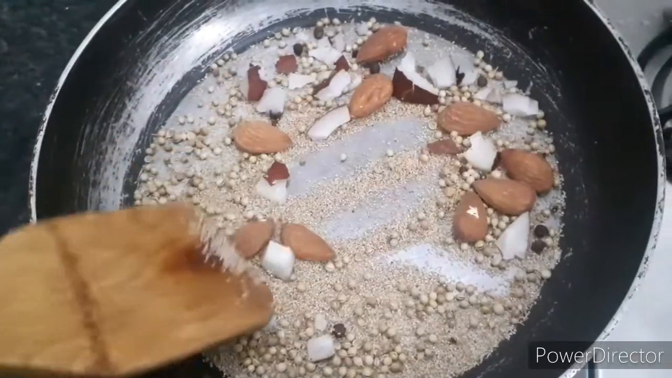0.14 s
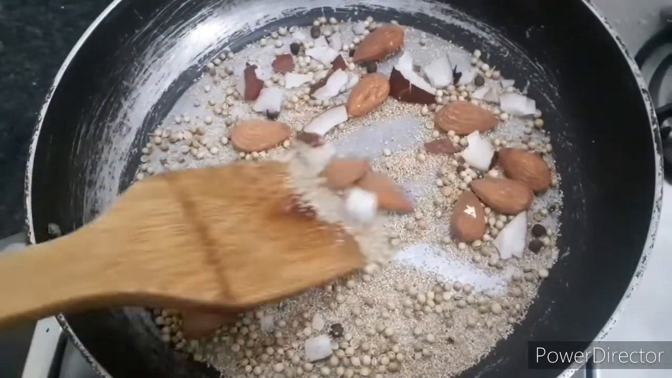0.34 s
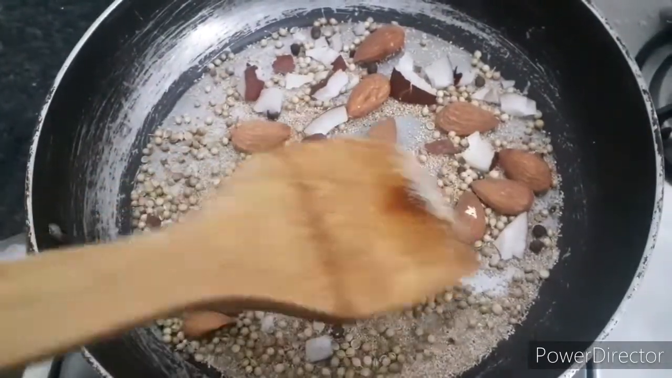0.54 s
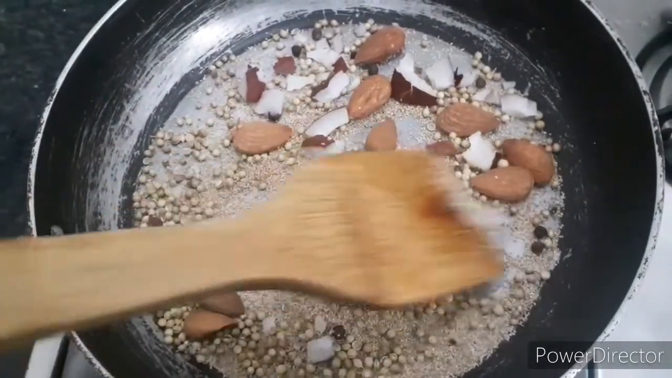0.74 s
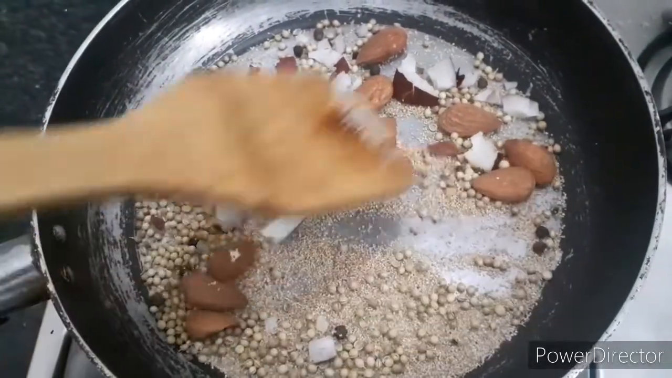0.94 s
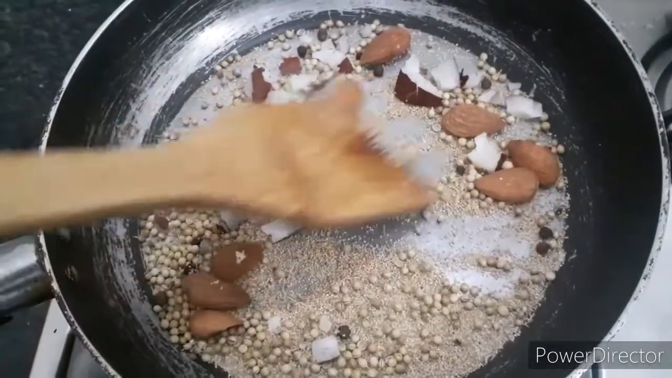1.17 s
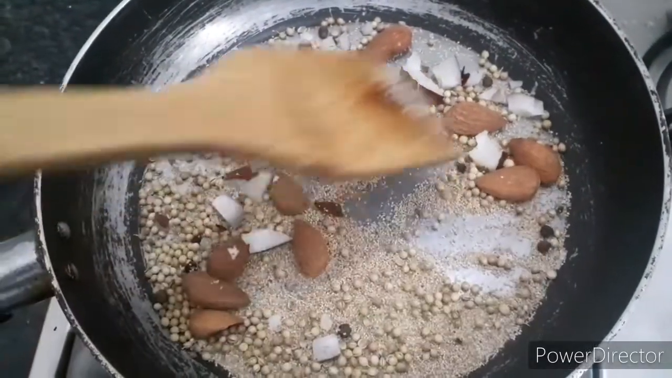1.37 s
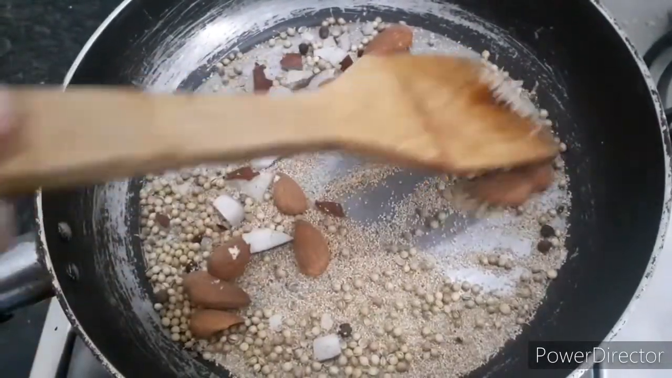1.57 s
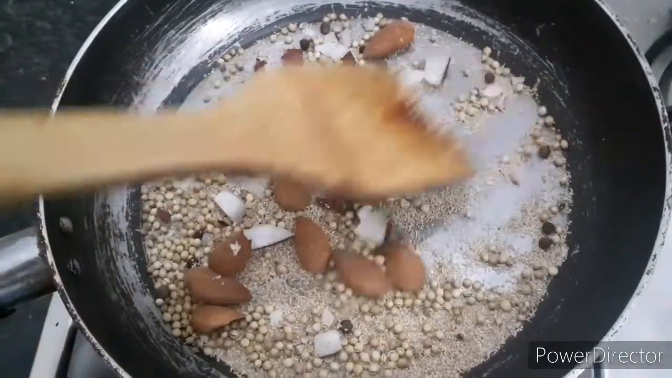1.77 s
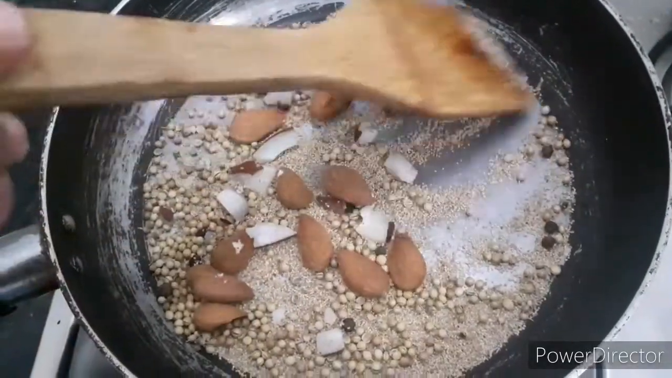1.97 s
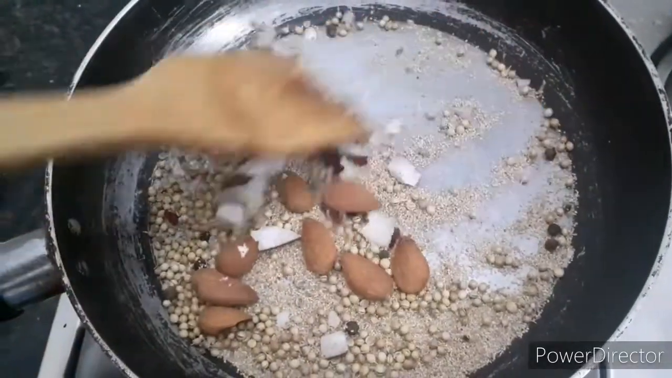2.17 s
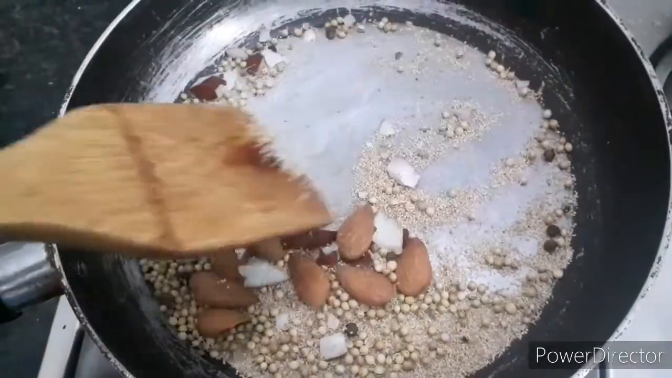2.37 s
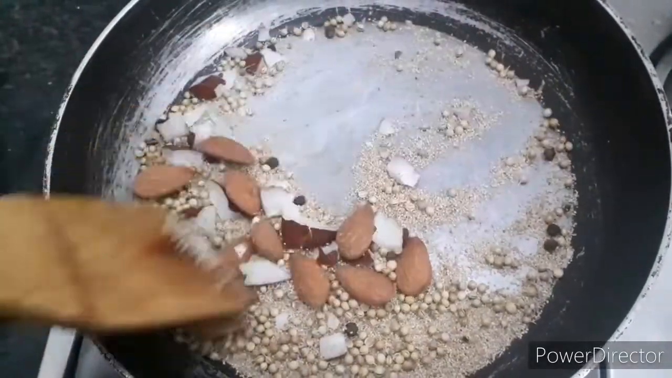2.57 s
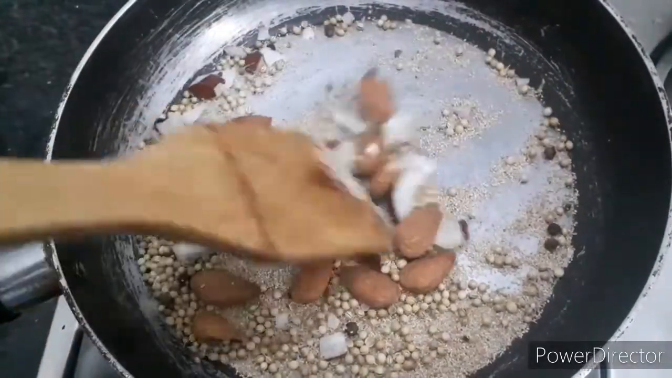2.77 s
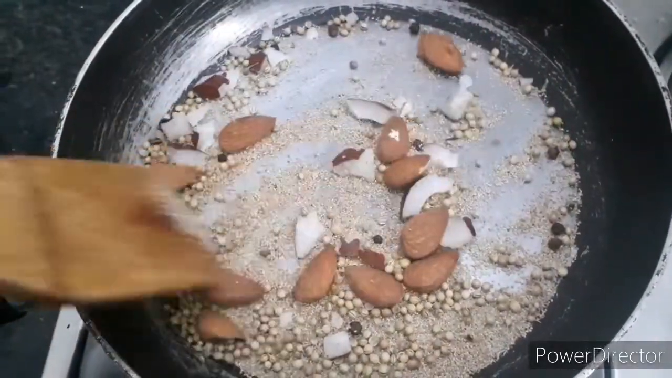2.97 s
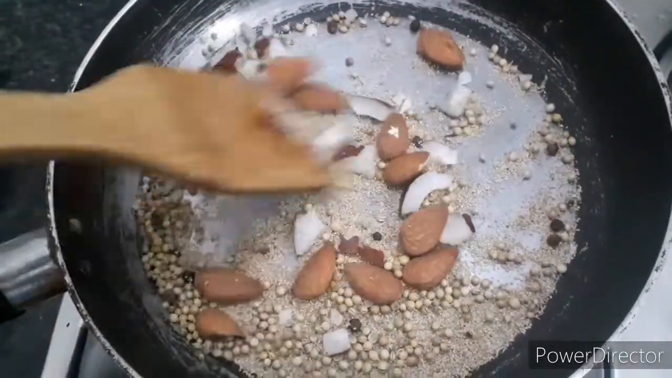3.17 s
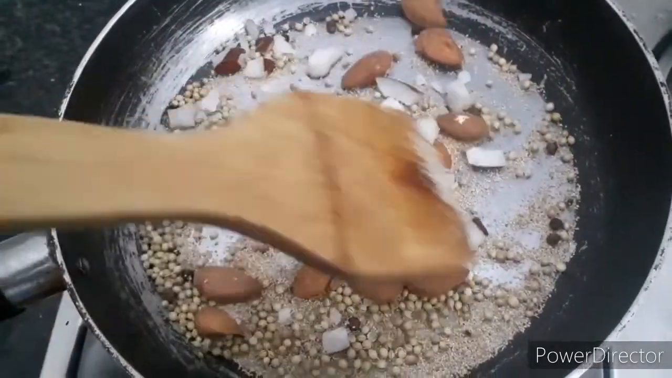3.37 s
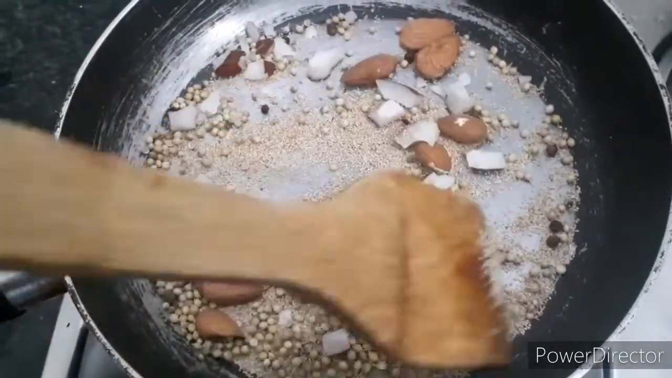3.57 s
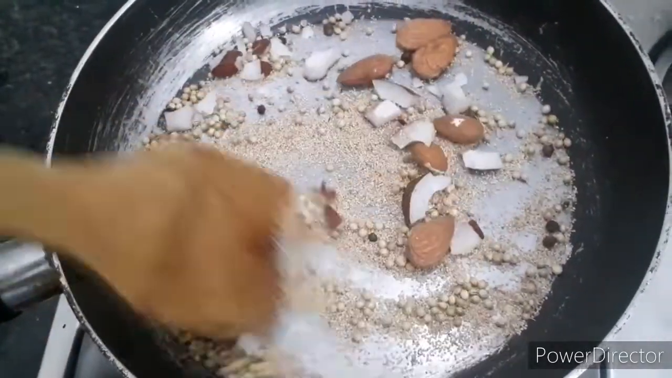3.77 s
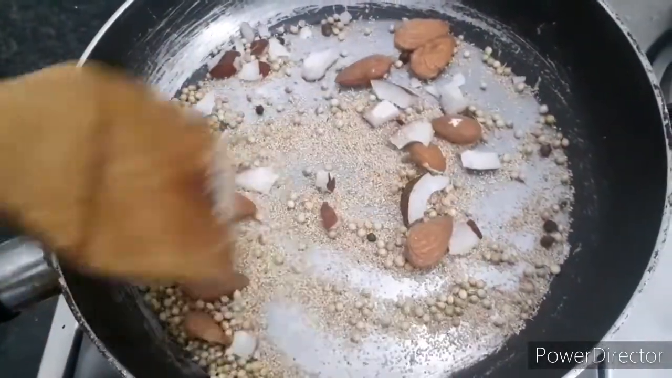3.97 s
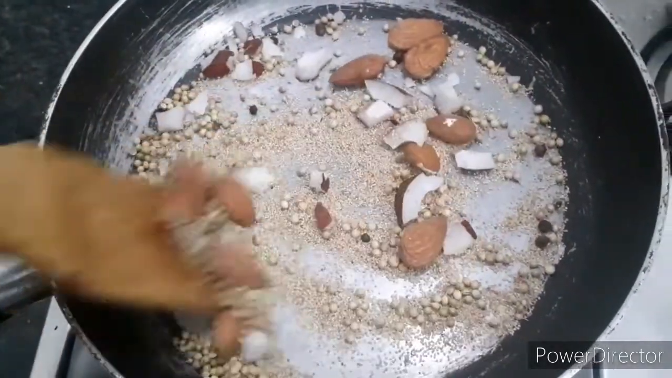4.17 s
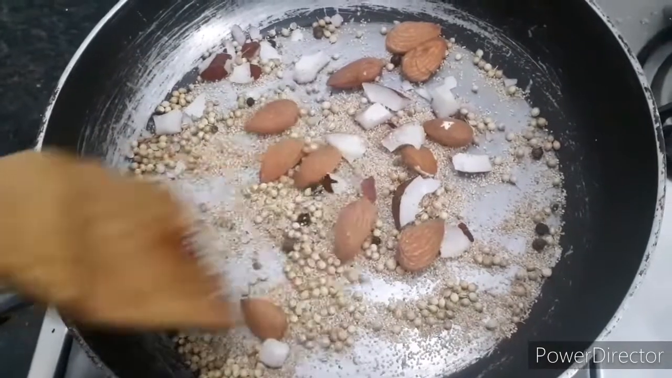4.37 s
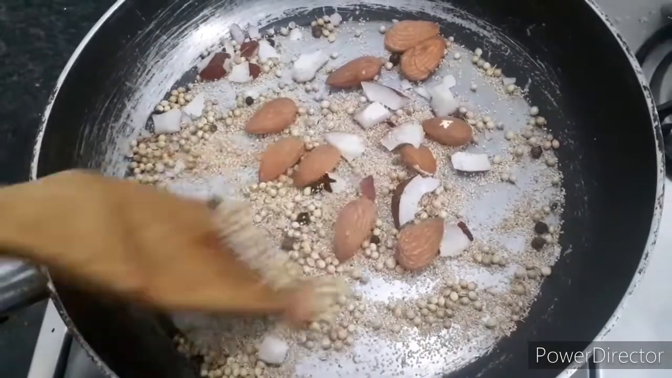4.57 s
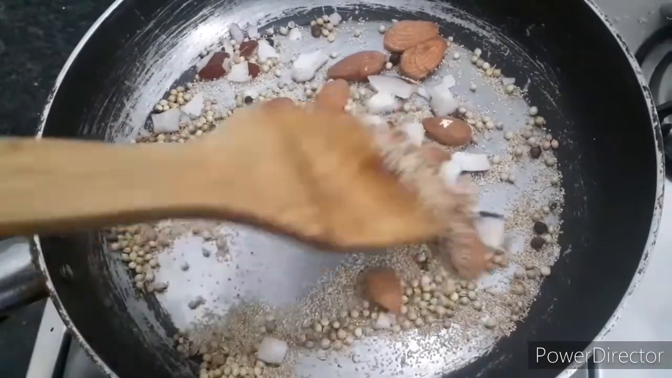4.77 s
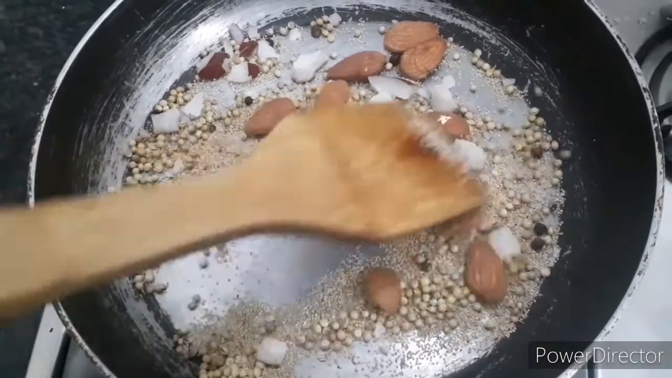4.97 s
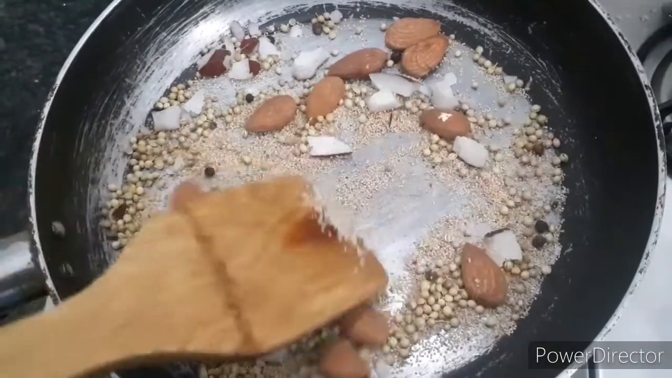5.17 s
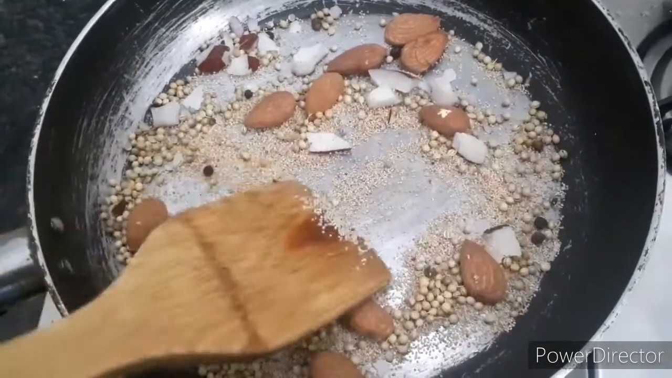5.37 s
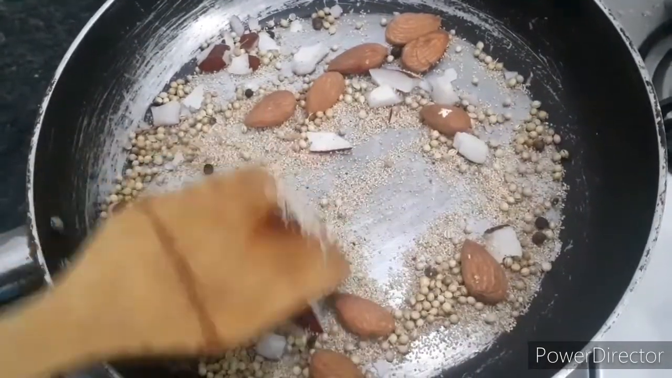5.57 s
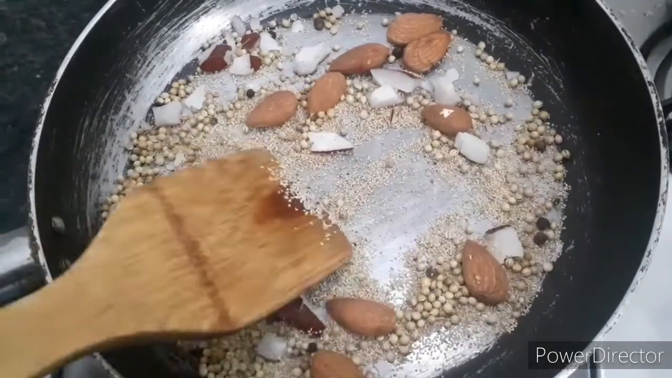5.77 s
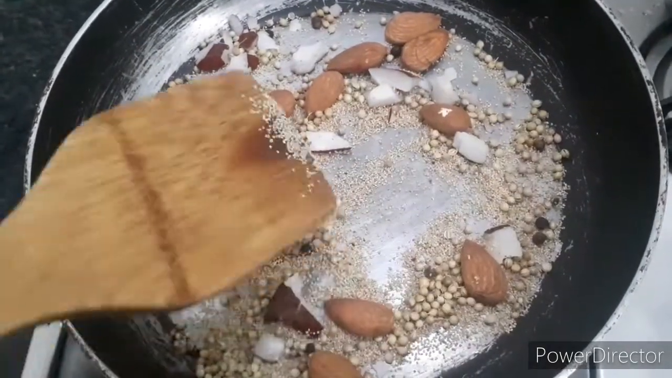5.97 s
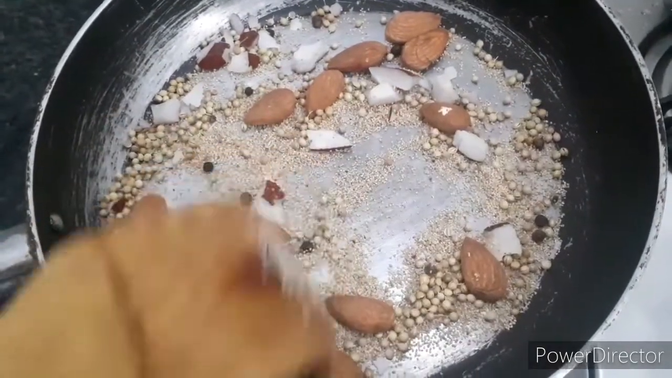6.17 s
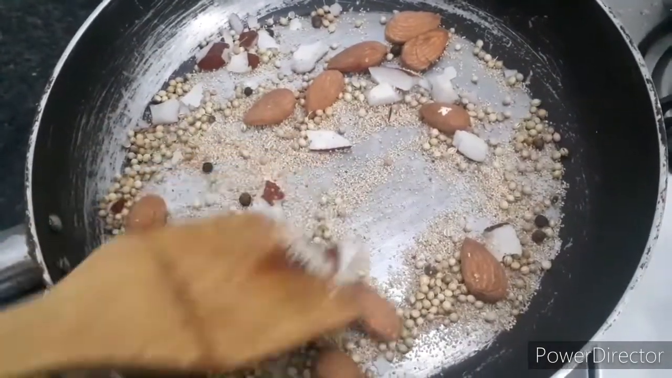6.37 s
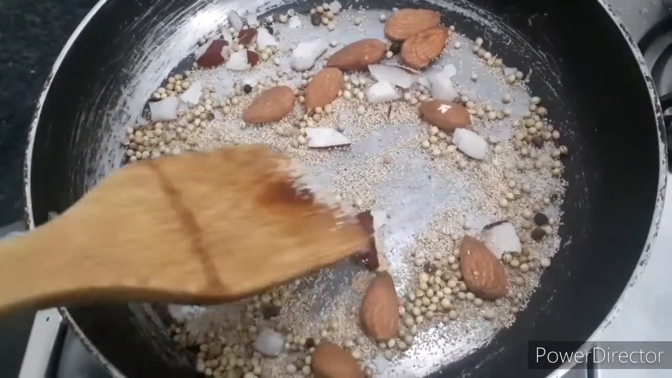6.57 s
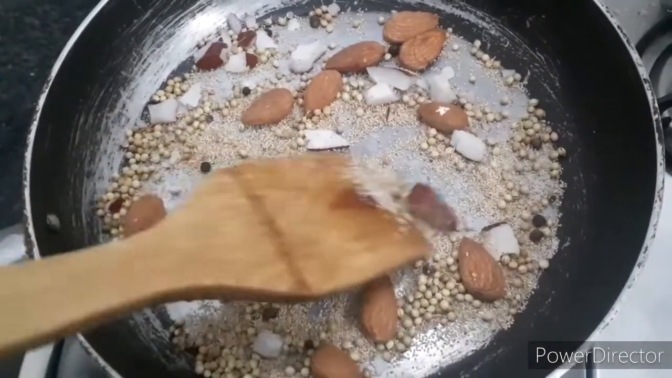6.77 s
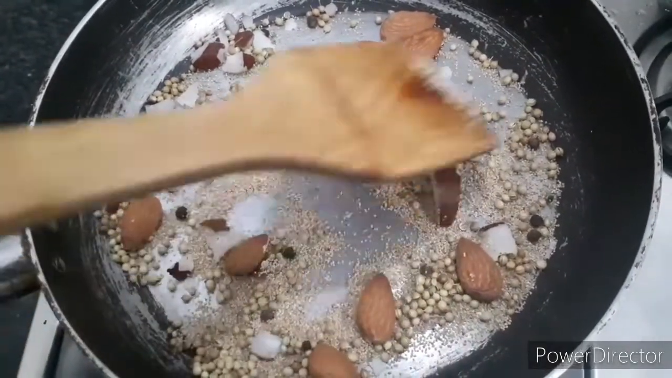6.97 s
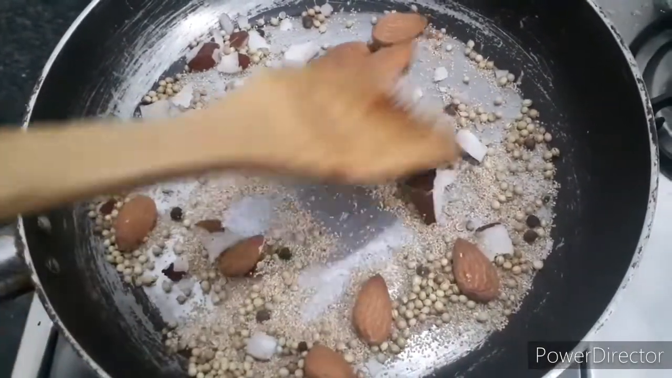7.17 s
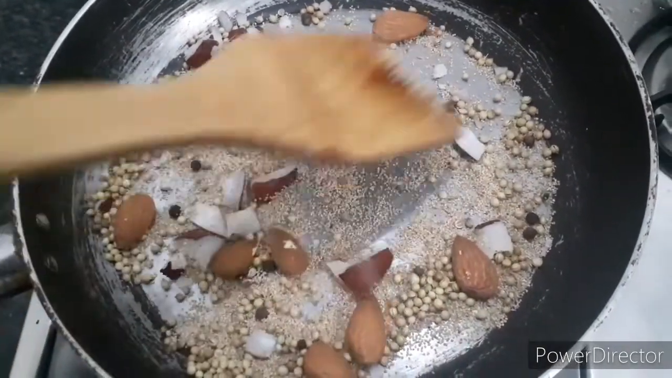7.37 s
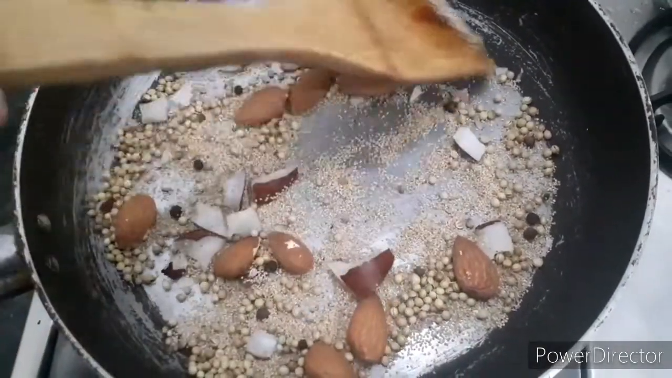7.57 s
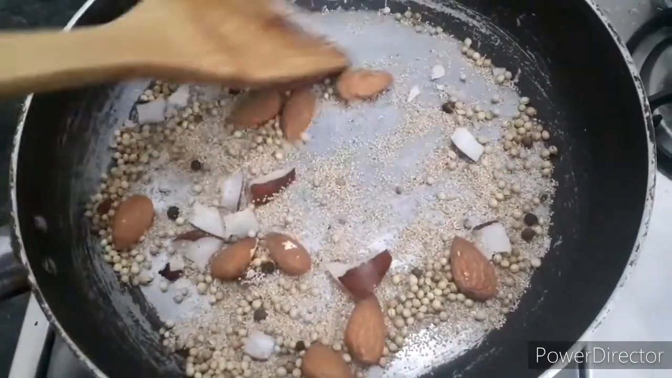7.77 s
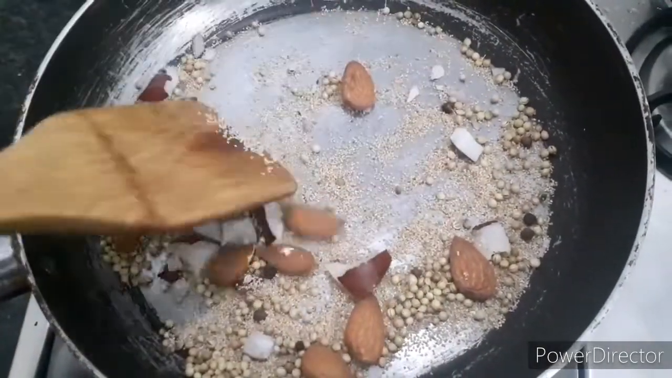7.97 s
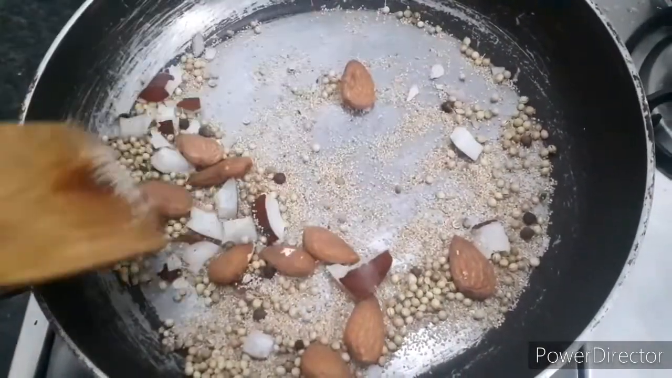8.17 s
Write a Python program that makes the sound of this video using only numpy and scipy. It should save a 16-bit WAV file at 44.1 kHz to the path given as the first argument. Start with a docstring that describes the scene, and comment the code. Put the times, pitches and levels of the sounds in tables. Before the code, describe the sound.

A dry metal pan is heard close up by a phone in a bare, reflective kitchen, over a low, fluttering burner murmur and faint hiss. At 0 seconds there is a faint tick and brief brush of seeds. From about 0.25 a wooden spatula knocks down and scrapes more loudly, pushing a rattling heap; further strokes begin near 0.8, 1.2, 1.6, 2.1 and 2.7. Almonds clink and seeds crackle, brightly around 2.3. A sharp knock at 3.1 leads into a nut clatter at 3.3, then strokes near 3.7, 4.2 and 4.6, the last with a hard metallic knock and tiny squeak. Scraping and tumbling nuts follow around 5.1, with a short touch at 5.4 and a knock at 5.65. After a quieter gap, knocks at 6.4 restart gritty stirring, with strokes at 6.7, 7.2 and 7.7, small rasps, and final clinks past 8 seconds.

```python
"""First a faint tick and brief brush of seeds over a burner's murmur, then louder scraping strokes:
a wooden spatula stirs almonds and seeds in a dry pan, close to a phone in a bare kitchen.
Random slips drive pan resonances for the blade; click trains in ringing bands make the seed heap.
Gritty contacts ring metal and wood for knocks and nuts; noise bursts make cracks, wavering tones squeaks.
Decaying noise echoes give the room; shaped noise gives burner murmur and hiss."""
import sys
import numpy as np
from scipy import signal
from scipy.fft import rfft, irfft
from scipy.io import wavfile
from scipy.ndimage import uniform_filter1d

SR = 44100
rng = np.random.default_rng(int(sys.argv[2]) if len(sys.argv) > 2 else 0)


def put_to_file(sound):
    """Save the sound as 16-bit audio at rate SR, in the file named by the first command-line argument."""
    columns = np.atleast_2d(sound).T  # one column per channel
    safe = np.clip(columns, -1, 1)
    whole_steps = np.round(safe * 32767)
    wavfile.write(sys.argv[1], SR, whole_steps.astype(np.int16))


N = 362943
TIME_S = np.arange(N) / SR

# Event levels are relative, ahead of trims, pan radiation and room.
# Spatula strokes: [touchdown t/s, swell/s, push/s, fade/(dB/s), extra swell of blade drag/s,
#   drag level/dB, coarse rolling level/dB, fine rattle level/dB, touchdown crack level/dB]
STROKES = [(0,0.0018,0.026,205,0.00092,-48,-78,-59,-45), (.243,0.09,0.031,187,0.086,-35.5,-51.5,-47.5,-41),
           (.762,0.11,0.062,173,0,-43,-54,-53,-31.5), (1.197,0.059,0.046,237,0.0019,-39,-50,-46.5,-38.5),
           (1.628,0.053,0.16,202,0.099,-42,-54,-53.5,-55), (2.093,.13,0.11,240,0.025,-38.5,-44.5,-44.5,-40),
           (2.667,0.043,.14,103,0.035,-39.5,-49.5,-48,-38.5),
           (3.122,0.0023,0.1,113,0.03,-40.5,-45.5,-51,-27.5), (3.28,0.022,.058,152,0,-46,-59,-53.5,-60),
           (3.673,0.06,0.095,158,0.064,-40.5,-45,-44,-35.5),
           (4.221,0.006,0.061,123,0.0044,-38.5,-44,-45.5,-28), (4.595,0.01,0.046,48,0.01,-40,-49,-45,-32),
           (5.034,0.043,0.13,160,0,-40,-46.5,-44.5,-41), (5.444,0.0011,0.0046,303,0,-45,-60,-53,-35.5),
           (6.417,0.0063,0.083,159,0.013,-61,-55.5,-57,-38), (6.728,0.07,0.039,315,0,-41,-46.5,-48,-36),
           (7.162,0.098,0.085,190,0.024,-40,-53.5,-49,-39), (7.697,0.19,0.13,208,0,-44.5,-48,-44.5,-54)]
# Drag, rolling, rattle at touchdown relative to full push: [level/dB] each
TOUCHDOWN_DB = [-15.5, -10.5, -14]
# Blade striking pan: [t/s, metal ring level/dB, centre f/Hz, pan thud level/dB, thud f/Hz,
#   thud decay/s, wood clack level/dB, pressed-blade tok level/dB]
KNOCKS = [(.247,-36,673,-43,144,0.018,-55,-58), (.288,-27,720,-37.5,133.3,0.071,-48,-36),
          (.762,-58,750,-45.5,138.5,0.044,-44.5,-63), (2.67,-44,680,-32,118.5,0.037,-42,-57),
          (2.698,-42,587,-35,103.6,0.035,-40,-19.5), (3.122,-25,1270,-31.5,292.5,0.037,-35,-27),
          (3.677,-33,620,-31.5,134.3,0.043,-47.5,-24.5), (4.224,-30,800,-34,285,0.024,-40.5,-54),
          (4.284,-35,600,-32.5,288,0.027,-47,-18.5), (4.621,-38,576,-32.5,135,0.045,-51,-32),
          (4.663,-19,1080,-40,285,.023,-29,-27), (5.075,-28,720,-40.5,328,0.03,-35,-47),
          (5.125,-40,720,-55,284,0.018,-48,-31), (5.445,-34.5,700,-40.5,131,0.036,-46,-48),
          (5.655,-30.5,710,-42,347,0.031,-29.5,-29.5), (6.419,-33,710,-41,156,0.021,-45,-50),
          (6.438,-38,546,-30,306.4,0.026,-47,-22.5), (6.772,-26.5,695,-44.5,145.5,0.056,-57,-49),
          (7.162,-37,685,-42,130,0.022,-39,-56), (7.289,-31,670,-45,328,0.022,-26,-37),
          (7.327,-29,696,-43.5,89.4,0.026,-40,-38), (7.758,-46,626,-29.5,310,0.011,-71,-60),
          (7.963,-28,1350,-40,128.7,0.042,-34,-49), (8.048,-36,680,-37.5,135,0.019,-63,-56)]
# Almonds tumbling onto the metal: [t/s, level/dB, centre f/Hz]
NUTS = [(.355,-31,770), (.883,-36,1290), (.886,-37.5,696), (.946,-32,706), (.964,-36.5,1340),
        (1.266,-45,1350), (1.288,-31,700), (1.805,-36,664), (1.834,-29,760), (1.866,-30,720),
        (2.191,-35,1420), (2.221,-26,1420), (2.251,-35.5,680), (2.269,-30,1370), (2.777,-30.5,1400),
        (2.818,-33.5,620), (3.31,-21,1570), (3.331,-32,1410), (3.784,-33,1420), (3.827,-38,1350),
        (4.883,-34.5,1330), (5.061,-30,710), (5.095,-32,730), (5.128,-25,1340), (5.138,-29,1390),
        (5.152,-34,750), (5.87,-42.5,950), (5.923,-45,750), (6.814,-28,880), (6.836,-35,740),
        (7.273,-37,730), (7.869,-36.5,690), (7.992,-29,1270), (8.108,-34,1210)]
# Seeds crushed under the blade: [t/s, level/dB, centre f/Hz, crumble decay/s]
CRACKS = [(.314,-33,4470,0.01), (0.336,-26.5,13500,0.0042), (2.192,-36,6500,0.0073), (2.209,-33,6000,.002),
          (2.247,-32,13500,.008), (2.277,-21.5,12300,0.021), (2.327,-25.5,9300,0.0025),
          (3.153,-29,10900,0.0036), (3.168,-22,14400,0.0031), (3.501,-47,6500,.006), (4.25,-28,8900,0.0061),
          (4.729,-34,5960,.004), (4.983,-41.5,8950,0.009), (5.075,-46,13100,.004),
          (5.128,-27.5,11000,0.0067), (5.655,-41,9000,.004), (6.742,-46,7500,0.0018),
          (6.774,-24,14100,0.0044), (6.788,-31,8000,0.0022), (6.822,-28,12900,0.01),
          (7.289,-31,6000,0.0023), (7.862,-40,13000,.008), (8.025,-30.5,11000,.0034)]
# Trapped seeds skidding: [mid t/s, level/dB, f/Hz, length at half height/s, glide/(octave/s)]
SQUEAKS = [(0.331,-40,7400,.0056,50), (0.333,-36,13900,.011,0), (.356,-48,15000,.0074,-6),
           (2.286,-38,6590,.02,3.5), (3.17,-41,8470,.011,-3), (4.636,-28,3447,.0091,-11.5),
           (6.834,-43.5,5690,.008,0), (7.834,-34,3010,.0081,-6)]
# Blade edge rasping: [mid t/s, level/dB, centre f/Hz, length at half height/s]
RASPS = [(0.896,-53,3200,.012), (2.19,-43,2150,0.016), (3.34,-43,2280,.012), (4.261,-36,2200,.018),
         (5.134,-45,3360,0.015), (5.145,-34,2500,.014), (5.189,-36.5,2650,.04), (7.23,-47,3100,0.027),
         (7.852,-40,2500,0.019)]
# Pan resonances: [f/Hz, width/Hz, level/dB]
PAN_MODES = [(285,25,-24), (350.2,25,8), (488,53,-8), (595.4,9,1), (680,82,6), (770,93,0), (1190,200,-18.5),
             (1341,55,0.5), (1360,114,0), (2110,87,-10), (2400,190,-11)]
# Pan rocking on its support: [f/Hz, width/Hz, level/dB]
SUPPORT_MODES = [(68.7, 3.3, -1), (111.8, 7.3, -5), (146.4, 41, -7), (186.2, 4.4, 0.5), (275.6, 31, -7.5),
                 (341.3, 14.5, -2.5), (472, 26, -4.5), (587.5, 6.8, -4.5)]
# Wooden blade resonances: [f/Hz, width/Hz, level/dB]
WOOD_MODES = [(1920, 770, 1), (2254, 240, 9), (2920, 130, -3), (3260, 210, -13)]
# Pan resonances damped by the pressing blade: [f/Hz, width/Hz, level/dB]
PRESSED_MODES = [(600, 113, 6.5), (1104, 460, -5.5)]
# Pan radiation, weak between resonances: [f/Hz, level/dB]
RADIATION = [(350,0.5), (500,-8), (600,-0.5), (820,0), (960,-6), (1200,-3), (1335,2.5), (1500,-7),
             (1720,-9), (2100,-1), (2500,-5.5), (3300,-4), (4500,0.5), (5700,3), (6800,4.5), (8000,-1.5),
             (9500,-7), (15000,-5.5)]
# Coarse seed spectrum: [f/Hz, level/dB]
COARSE_SPECTRUM = [(900, -29), (1700, -3), (2250, 3.5), (2600, -5.5), (3100, 4), (3600, -10), (4200, -13.5),
                   (5200, -16), (8000, -46)]
# Fine seed spectrum: [f/Hz, level/dB]
FINE_SPECTRUM = [(2200, -28), (3600, -6), (4600, -4.5), (5700, -1.5), (6700, -4.5), (8200, 0),
                 (10000, -5.5), (12200, 5), (15600, -2.5)]
# Places in the pan: [left port lead/s] each
PLACE_LEADS_S = [.00003, .00012, .00019, .00028]
# Pan balance, left minus right: [f/Hz, level/dB]
PAN_BALANCE = [(120, -2.5), (420, -4), (680, 0), (1350, -2.5), (2200, -9.5), (3600, -5.5), (6500, -4),
               (8200, 1), (10000, 0.5), (14000, 7)]
# Kitchen decay: [f/Hz, t60/s]
KITCHEN_T60 = [(150, 0.94), (600, 0.54), (1500, 0.46), (3500, 0.53), (7000, 0.37), (14000, 0.42)]
# Burner murmur spectrum: [f/Hz, level/dB]
BURNER_SPECTRUM = [(18, -61), (30, -45), (80, -14.5), (110, -4), (150, 2), (206, -17), (271, -9.5),
                   (395, -18.5), (466, -19.5), (542, -30.5), (620, -34), (659, -17), (790, -15.5),
                   (904, -37.5), (1100, -44), (1430, -73), (2420, -120)]
# Burner hiss spectrum: [f/Hz, level/dB]
HISS_SPECTRUM = [(590, -22.5), (1000, 8.5), (1110, 6.5), (1720, 0), (1970, -9), (2910, -6.5), (3230, -12),
                 (3460, -5), (3880, -15.5), (6590, -2), (8200, -10), (12000, -12), (15600, -16)]
# Hiss balance, left minus right: [f/Hz, level/dB]
HISS_BALANCE = [(1000, -5.5), (2500, -18), (6000, -7.5), (8500, 1.5), (14000, 2)]


def undb(db):
    """Decibels to gain."""
    return 10 ** (np.asarray(db) / 20)


def unit(x):
    """Scale to rms 1."""
    return x / np.sqrt(np.mean(x ** 2))


def peak_at(x, db):
    """Scale to a peak level."""
    return undb(db) * x / np.abs(x).max()


def add(track, start_s, sound):
    """Mix a sound in at a time, cut at the end of the scene."""
    start = max(int(start_s * SR), 0)
    part = sound[:max(N - start, 0)]
    track[start:start + len(part)] += part


def at_hz(points, hz):
    """Interpolate (Hz, value) points on a log-frequency axis."""
    f_hz, value = np.transpose(points)
    return np.interp(np.log(np.maximum(hz, 1)), np.log(f_hz), value)


def colour(x, points, share=1):
    """Minimum-phase filter with share times the dB gain of (Hz, dB) points."""
    size = 8192
    bins_hz = np.arange(size // 2 + 1) * SR / size
    cepstrum = irfft(np.log(undb(share * at_hz(points, bins_hz))))
    # fold the cepstrum to make the response causal
    cepstrum[1:size // 2] *= 2
    cepstrum[size // 2 + 1:] = 0
    response = irfft(np.exp(rfft(cepstrum)))
    return signal.oaconvolve(x, response)[:len(x)]


def band(x, hz, spread):
    """Band-pass from hz / spread to hz * spread, capped below Nyquist."""
    spread = max(spread, 1.01)
    edges_hz = np.minimum([hz / spread, hz * spread], [.4 * SR, .48 * SR])
    return signal.sosfilt(signal.butter(2, edges_hz, "band", fs=SR, output="sos"), x)


def ring(x, modes):
    """Drive parallel resonances of (Hz, width Hz, dB)."""
    out = 0
    for hz, width_hz, db in modes:
        b, a = signal.iirpeak(hz, hz / width_hz, fs=SR)
        out = out + undb(db) * signal.lfilter(b, a, x)
    return out


def walk(rate_hz):
    """Random levels of spread near 1, joined by straight lines."""
    levels = rng.standard_normal(int(N / SR * rate_hz) + 2)
    return np.interp(TIME_S * rate_hz, np.arange(len(levels)), levels)


def clicks(rate_hz, scatter_db):
    """Random contacts of uneven size and either sign, at rms 1."""
    size = undb(scatter_db * np.clip(rng.standard_normal(N), -2, 2))
    hits = rng.random(N) < rate_hz / SR
    return unit(hits * size * rng.choice([-1, 1], N))


def stroke_gains(bite_s=0.00068, sag_db_per_s=22.5):
    """Drag, rolling, rattle gains: touch down, gather a heap, push it while it thins, ease off."""
    gains = np.zeros((3, N))
    t = np.arange(int(.8 * SR)) / SR
    for start_s, swell_s, push_s, fade_db_per_s, grip_s, *levels_db, _ in STROKES:
        sag_db = sag_db_per_s * np.clip(t - swell_s, 0, push_s)
        fade_db = fade_db_per_s * np.maximum(t - swell_s - push_s, 0)
        bite = np.minimum(t / bite_s, 1)
        # only the drag takes longer to swell, until the blade grips
        for gain, db, touch_db, late_s in zip(gains, levels_db, TOUCHDOWN_DB, (grip_s, 0, 0)):
            to_gather = np.maximum(1 - t / (swell_s + late_s), 0)
            add(gain, start_s, bite * undb(db + touch_db * to_gather - sag_db - fade_db))
    return gains


def blade(drag, trim_db=-3, judder_db=-7, grip_db=3, shift_db=4.5, wander_s=0.00102):
    """Stick-slip: slips drive pan resonances in shifting proportion and judder the support."""
    slips = band(clicks(rate_hz=600, scatter_db=5) * undb(grip_db * walk(45)), 360, 7.3)
    metal = 0
    for mode in PAN_MODES:
        push = slips * unit(undb(shift_db * walk(30)))
        metal = metal + ring(push * drag, [mode])
    metal = metal / np.std(ring(slips, PAN_MODES))
    # the travelling blade bends the pitch by a few percent
    metal = np.interp(TIME_S + wander_s * walk(25), TIME_S, metal)
    judder = ring(slips * drag, SUPPORT_MODES) / np.std(ring(slips, SUPPORT_MODES))
    return undb(trim_db) * (metal + undb(judder_db) * judder)


def seeds(spectrum, lowest_hz, highest_hz, rate_hz, scatter_db, tick_db, patchy_db, count=8):
    """Seed heap: each size class rings briefly at its own pitch in bursts, among broad ticks."""
    rings = 0
    for hz in np.geomspace(lowest_hz, highest_hz, count):
        hits = clicks(rate_hz / count, scatter_db) * undb(patchy_db * walk(50))
        rings = rings + band(hits, hz, 1.16)
    ticks = clicks(rate_hz, scatter_db) * undb(patchy_db * walk(70))
    return unit(unit(colour(rings, spectrum)) + undb(tick_db) * unit(colour(ticks, spectrum)))


def skid(hz, length_s, glide=0, waver=0.049):
    """One skidding seed: a swelling tone of unsteady pitch; glide in octaves per second."""
    swell = signal.windows.hann(int(2 * length_s * SR))
    t = np.arange(len(swell)) / SR - length_s
    unsteady = unit(uniform_filter1d(rng.standard_normal(SR // 6), size=40))[:len(t)]
    pitch_hz = hz * 2 ** (glide * t) * (1 + waver * unsteady)
    return unit(swell * np.sin(2 * np.pi * np.cumsum(pitch_hz) / SR))


def scuffs(lowest_hz, highest_hz, scuff_db, longest_s, count=450):
    """Single seeds and nut skins scuff the metal, each with its own pitch, length and size."""
    out = np.zeros(N)
    for when, pitch, length, size in rng.random((count, 4)):
        hz = lowest_hz * (highest_hz / lowest_hz) ** pitch
        add(out, when * N / SR, size * skid(hz, longest_s / 10 ** length))
    return undb(scuff_db) * out


def strays(rattle, stray_db=-17, roll_s=0.12):
    """Loose seeds keep hopping: sparse clicks follow the rattle through a leaky average."""
    keep = np.exp(-1 / (roll_s * SR))
    unrest = signal.lfilter([1 - keep], [1, -keep], rattle)
    hops = unit(colour(clicks(rate_hz=22, scatter_db=7), FINE_SPECTRUM))
    return undb(stray_db) * unrest * hops


def contact(t, rebound, grit_decay_s=0.0016, grit=0.13, nominal_rebound_s=0.00279):
    """Contact force: an impulse, decaying grit and one rebound at a varied delay."""
    force = (t == 0) + grit * rng.standard_normal(len(t)) * np.exp(-t / grit_decay_s)
    add(force, nominal_rebound_s * rng.uniform(0.721, 1.207), np.array([rebound]))
    return force


def struck(modes, uneven_db=2, detune=0.0047):
    """Each struck spot weights and tunes the resonances a little differently."""
    chance = rng.standard_normal((len(modes), 2))
    return [(hz * (1 + detune * a), width_hz, db + uneven_db * b)
            for (hz, width_hz, db), (a, b) in zip(modes, chance)]


def clang(force, hz, ring_db=6, spread=1.7):
    """Metal answers a contact around one pitch: direct blow plus pan resonances."""
    blow = band(force, hz, spread)
    return blow + undb(ring_db) * ring(blow, struck(PAN_MODES))


def thud(t, hz, decay_s, sag=0.18, sag_s=0.021, wobble=.12, rumble_db=-4, rise_s=0.0039, overtone_db=-11):
    """Shoved pan shudders in harmonics of a sagging, unsteady pitch and rumbles on its support."""
    pitch_hz = hz * (1 + sag * np.exp(-t / sag_s) + wobble * walk(149.6)[:len(t)])
    phase = 2 * np.pi * np.cumsum(pitch_hz) / SR
    shudder = sum(undb(overtone_db * k) * np.sin((k + 1) * phase) for k in range(3))
    rumble = unit(ring(band(rng.standard_normal(len(t)), hz, 3.82), SUPPORT_MODES))
    envelope = (1 - np.exp(-t / rise_s)) * np.exp(-t / decay_s)
    return band((shudder + undb(rumble_db) * rumble) * envelope, 260, 4.3)


def knocks(clack_trim_db=11, tok_trim_db=-1.5):
    """Contacts ring pan and wood, a pressed blade gives a dead tok, and the push rocks the pan."""
    out = np.zeros(N)
    t = np.arange(SR // 4) / SR
    for start_s, ring_db, hz, thud_db, thud_hz, decay_s, wood_db, pressed_db in KNOCKS:
        force = contact(t, rebound=0.45)
        # soft wood passes little high treble: two band-passes in series
        dull_force = band(band(force, 2600, 1.55), 2600, 1.65)
        clack = ring(dull_force, struck(WOOD_MODES, uneven_db=3, detune=.03))
        tok = ring(band(contact(t, rebound=0.3), 790, 2.22), PRESSED_MODES)
        add(out, start_s, peak_at(clang(force, hz), ring_db))
        add(out, start_s, peak_at(clack, wood_db + clack_trim_db))
        add(out, start_s, peak_at(tok, pressed_db + tok_trim_db))
        add(out, start_s, undb(thud_db) * thud(t, thud_hz, decay_s))
    return out


def touchdowns(trim_db=-4, tap_hz=750):
    """The landing edge taps the metal, in step with the crack level of its stroke."""
    out = np.zeros(N)
    t = np.arange(SR // 4) / SR
    for start_s, *_, crack_db in STROKES:
        tap = clang(contact(t, rebound=.4), tap_hz, ring_db=4, spread=3.6)
        add(out, start_s, peak_at(tap, crack_db + trim_db))
    return out


def nuts(rock_db=-19):
    """A falling almond rings the metal around one pitch and barely rocks the pan."""
    out = np.zeros(N)
    t = np.arange(SR // 4) / SR
    for start_s, db, hz in NUTS:
        force = contact(t, rebound=.15)
        metal = clang(force, hz, ring_db=5, spread=1.3)
        rocking = ring(band(force, 234, 1.42), SUPPORT_MODES)
        add(out, start_s, peak_at(metal, db) + peak_at(rocking, db + rock_db))
    return out


def snap(hz, decay_s, spread):
    """Tiny fractures: a decaying noise burst around one pitch."""
    t = np.arange(SR // 20) / SR
    return band(rng.standard_normal(len(t)) * np.exp(-t / decay_s), hz, spread)


def cracks(landing_trim_db=-2, landing_hz=6350, landing_decay_s=0.0023):
    """Seeds snap in bright crumbling bursts, at every touchdown and now and then in a push."""
    out = np.zeros(N)
    for start_s, *_, db in STROKES:
        landing = snap(landing_hz, landing_decay_s, spread=2.12)
        add(out, start_s, peak_at(landing, db + landing_trim_db))
    for start_s, db, hz, decay_s in CRACKS:
        add(out, start_s, peak_at(snap(hz, decay_s, spread=1.88), db))
    return out


def squeaks(trim_db=-7):
    """The loudest skids of trapped seeds: short wavering, gliding tones."""
    out = np.zeros(N)
    for mid_s, db, hz, length_s, glide in SQUEAKS:
        add(out, mid_s - length_s, undb(db + trim_db) * skid(hz, length_s, glide))
    return out


def rasps(trim_db=-4, spread=1.156):
    """The dry blade edge stutters over the metal: dense clicks in a narrow, grating band."""
    out = np.zeros(N)
    stutter = clicks(rate_hz=1400, scatter_db=2.5)
    for mid_s, db, hz, length_s in RASPS:
        swell = signal.windows.hann(int(2 * length_s * SR))
        slips = np.roll(stutter, -int(mid_s * SR))[:len(swell)]
        rasp = unit(band(slips * swell, hz, spread))
        add(out, mid_s - length_s, undb(db + trim_db) * rasp)
    return out


def balance(pair, points):
    """Lean each frequency left or right by (Hz, dB) points, half on each side."""
    return np.array([colour(pair[0], points, 1 / 2), colour(pair[1], points, -1 / 2)])


def echoes(wet_db=-3, early_db=-4, early_decay_s=0.003, build_s=0.00072):
    """Echo pair of one place: pan wall and hob reflect at once, then the hard walls ring on."""
    t = np.arange(int(.7 * SR)) / SR
    tail = 0
    for hz in 62.5 * 2 ** np.arange(9):
        apart = min(hz / 1400, 1)  # long waves are alike at both ports
        common = np.sqrt(1 - apart ** 2) * rng.standard_normal(len(t))
        noise = common + apart * rng.standard_normal((2, len(t)))
        tail = tail + band(noise, hz, np.sqrt(2)) * 1000 ** (-t / at_hz(KITCHEN_T60, hz))
    tail = tail * (1 - np.exp(-t / build_s))
    early = band(rng.standard_normal((2, len(t))), 3080, 3.56) * np.exp(-t / early_decay_s)
    return (undb(wet_db) * unit(tail) + undb(early_db) * unit(early)) / np.sqrt(len(t))


def kitchen(x, roam_db=9):
    """Sound roams between places in the pan, each with its own echoes and port lag."""
    shares = np.array([undb(roam_db * walk(25)) for _ in PLACE_LEADS_S])
    shares /= shares.sum(axis=0)
    power = np.sqrt(np.sum(shares ** 2, axis=0))
    pair = 0
    for share, lead_s in zip(shares, PLACE_LEADS_S):
        direct = np.array([x * share, np.roll(x * share, round(lead_s * SR))])
        # the echo feeds keep constant total power
        reflected = signal.fftconvolve([x * share / power], echoes())[:, :N]
        pair = pair + direct + reflected
    return balance(pair, PAN_BALANCE)


def burner(murmur_db=-52, hiss_db=-68, flutter_db=2, side_db=-17, lean_db=-3):
    """The flame murmurs and flutters as low shaped noise, with a faint steady hiss."""
    mid, side = (unit(colour(rng.standard_normal(N), BURNER_SPECTRUM)) for _ in range(2))
    murmur = mid + undb(side_db) * np.array([side, -side])
    murmur = murmur * undb(murmur_db + flutter_db * walk(18))
    lean = undb(np.array([[lean_db], [-lean_db]]) / 2)
    hiss = np.array([unit(colour(rng.standard_normal(N), HISS_SPECTRUM)) for _ in range(2)])
    return murmur * lean + undb(hiss_db) * balance(hiss, HISS_BALANCE)


def scene(coarse_db=-3.0, fine_db=-2):
    """Pan sounds radiate into the kitchen, over the burner."""
    drag, rolling, rattle = stroke_gains()
    coarse = seeds(COARSE_SPECTRUM, 1900, 4180, rate_hz=1100, scatter_db=1.5, tick_db=0.0, patchy_db=3.5)
    fine = seeds(FINE_SPECTRUM, 4280, 14100, rate_hz=550, scatter_db=-1.0, tick_db=1, patchy_db=2.5)
    heap = undb(coarse_db) * rolling * coarse + undb(fine_db) * rattle * fine
    heap += strays(rattle)
    heap += rolling * scuffs(1800, 3970, scuff_db=2.5, longest_s=0.0044)
    heap += rattle * scuffs(4450, 15000, scuff_db=1.5, longest_s=0.0037)
    impacts = touchdowns() + knocks() + nuts()
    details = cracks() + squeaks() + rasps()
    pan = colour(blade(drag) + heap + impacts + details, RADIATION)
    return kitchen(pan) + burner()


def record(dry, top_hz=15800):
    """The phone cuts the top: a steep elliptic low-pass."""
    return signal.sosfilt(signal.ellip(10, .2, 70, top_hz, fs=SR, output="sos"), dry)


dry = scene()
out = record(dry)
put_to_file(out)
```